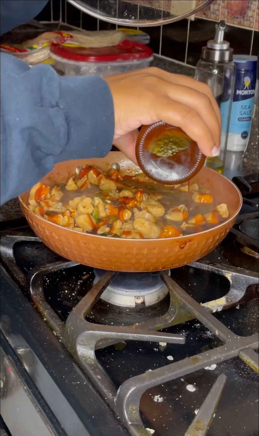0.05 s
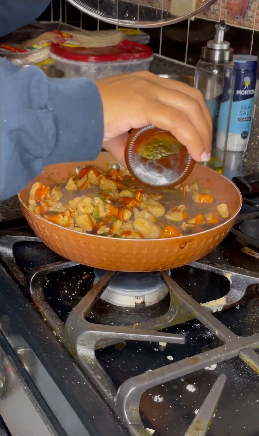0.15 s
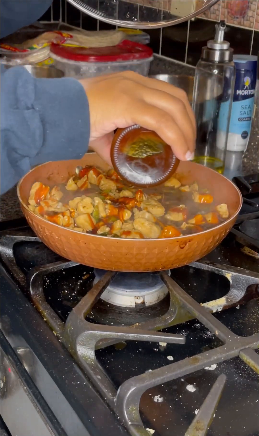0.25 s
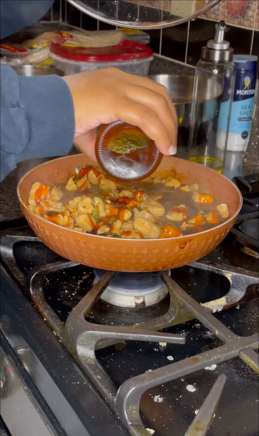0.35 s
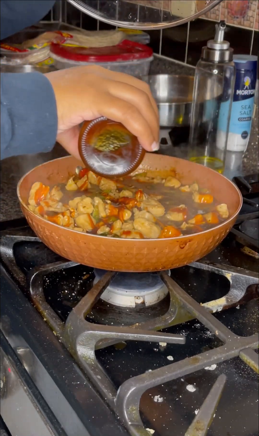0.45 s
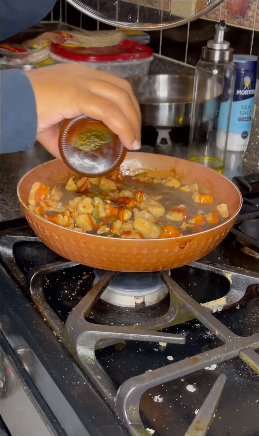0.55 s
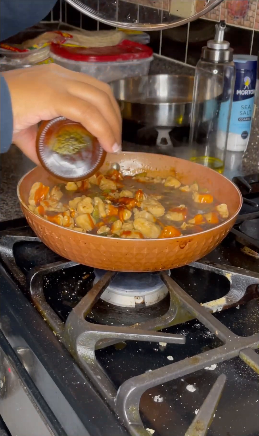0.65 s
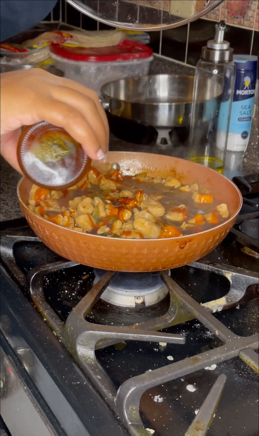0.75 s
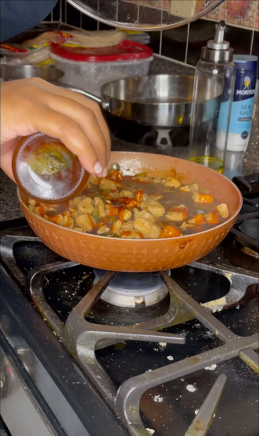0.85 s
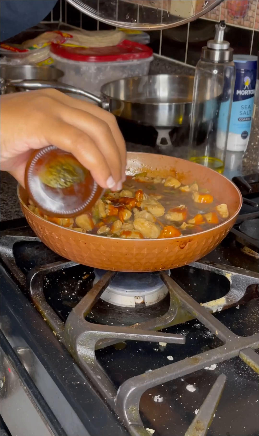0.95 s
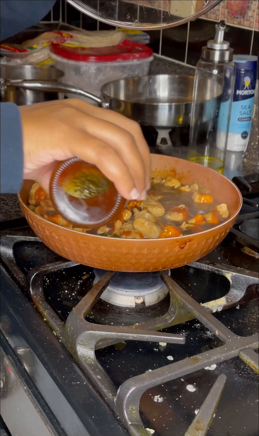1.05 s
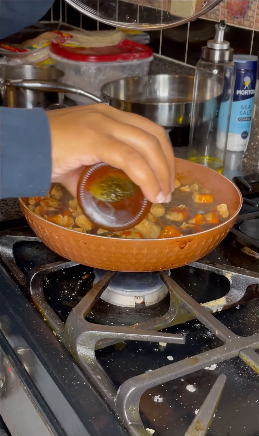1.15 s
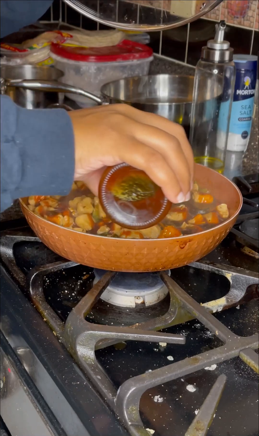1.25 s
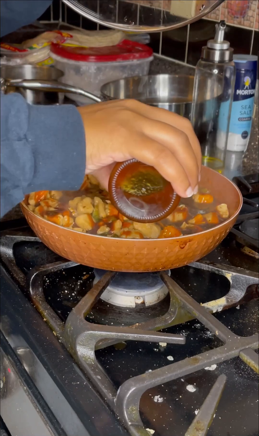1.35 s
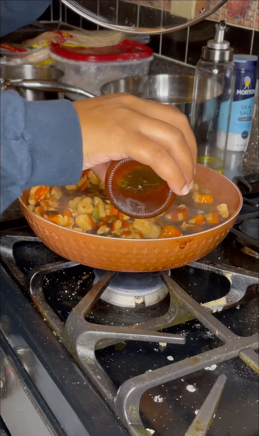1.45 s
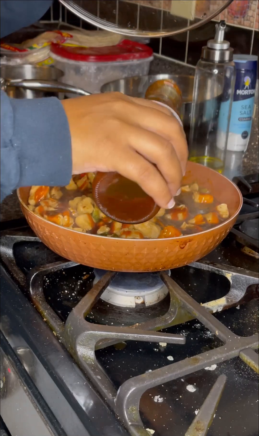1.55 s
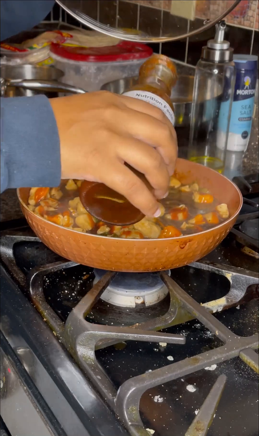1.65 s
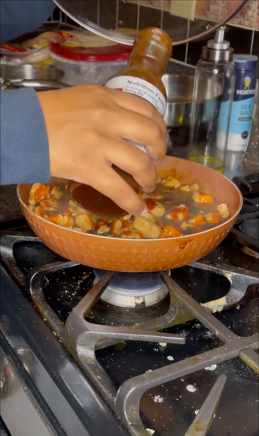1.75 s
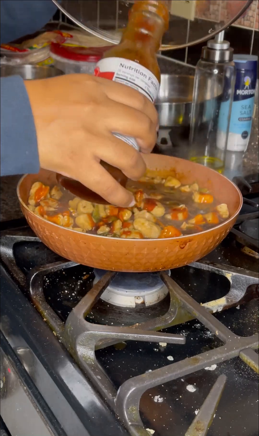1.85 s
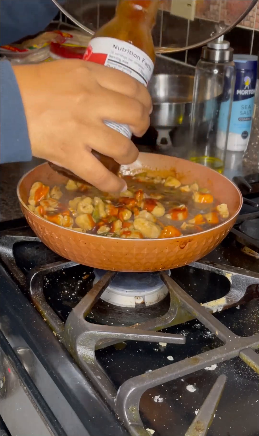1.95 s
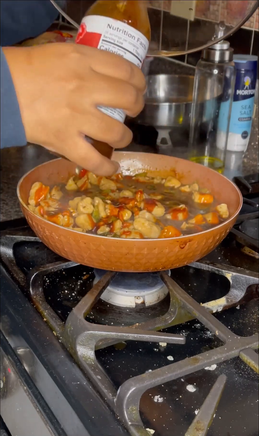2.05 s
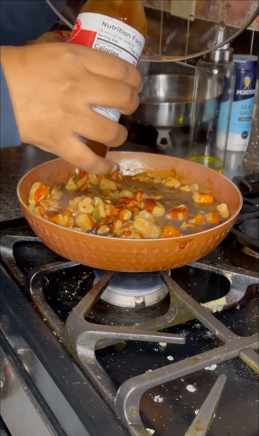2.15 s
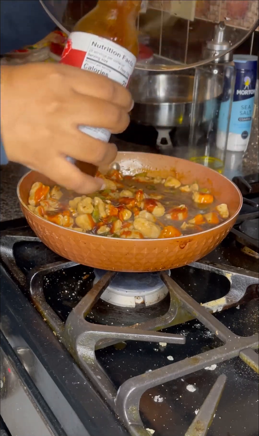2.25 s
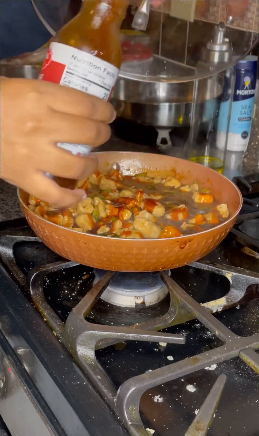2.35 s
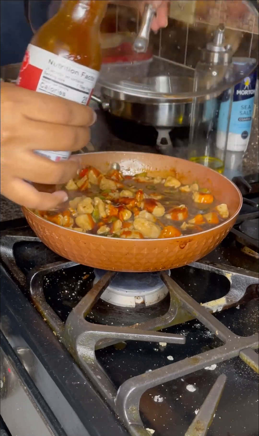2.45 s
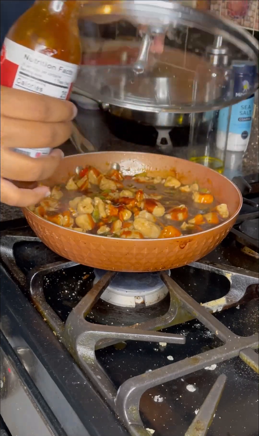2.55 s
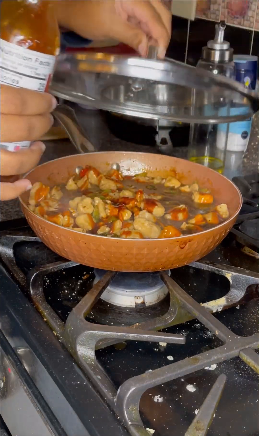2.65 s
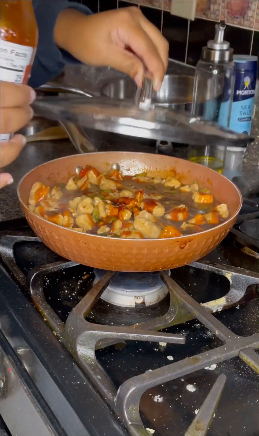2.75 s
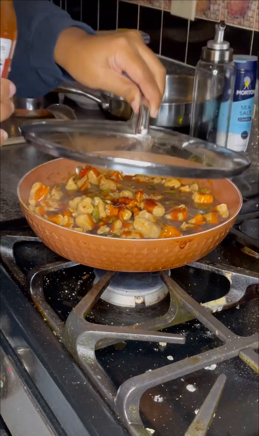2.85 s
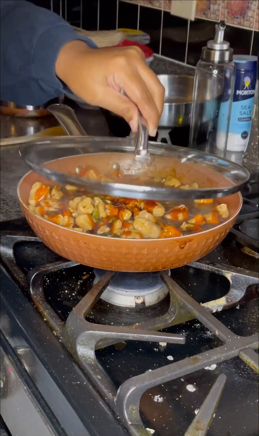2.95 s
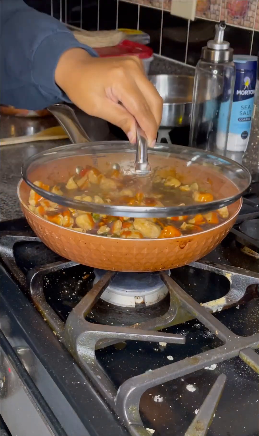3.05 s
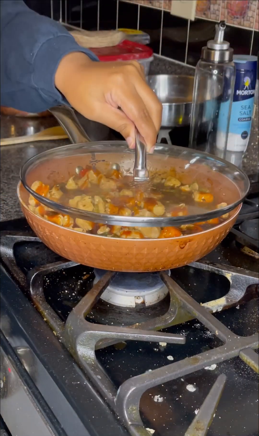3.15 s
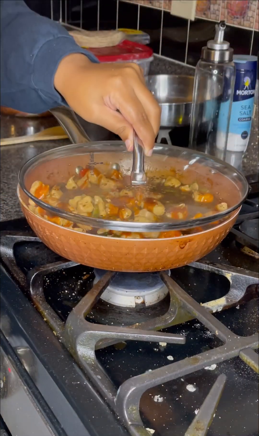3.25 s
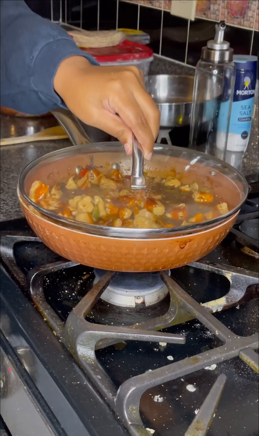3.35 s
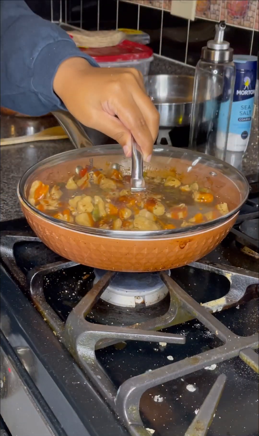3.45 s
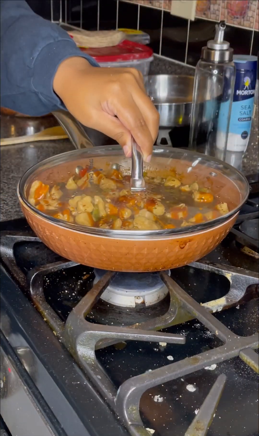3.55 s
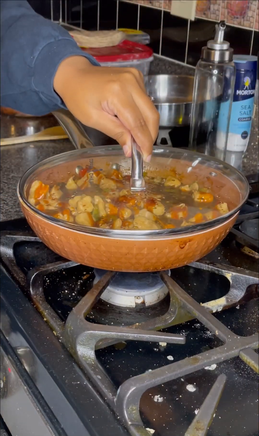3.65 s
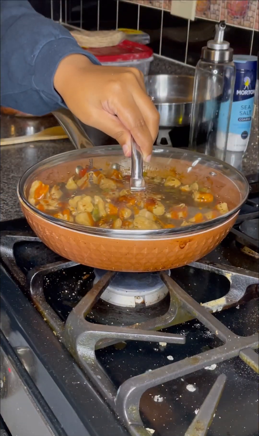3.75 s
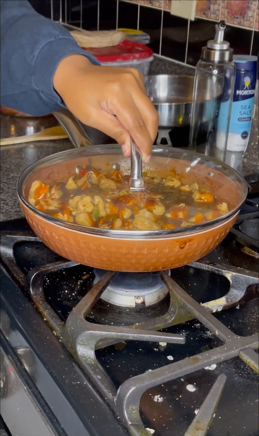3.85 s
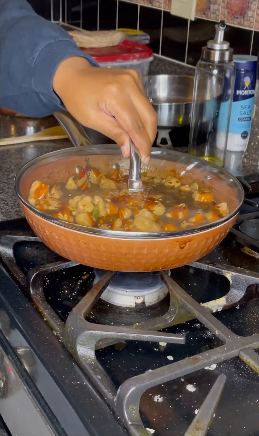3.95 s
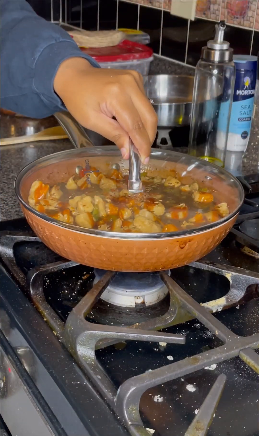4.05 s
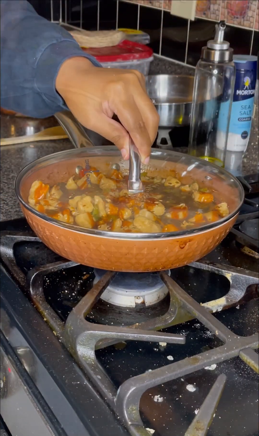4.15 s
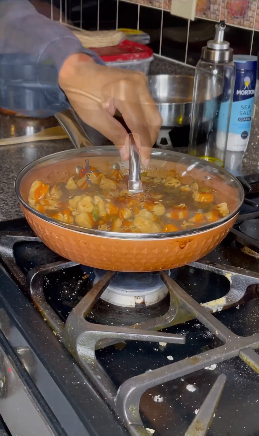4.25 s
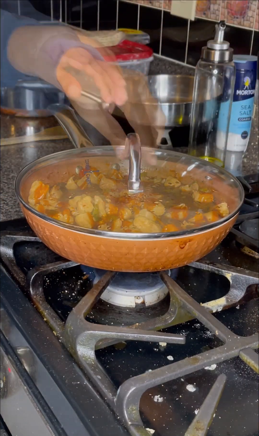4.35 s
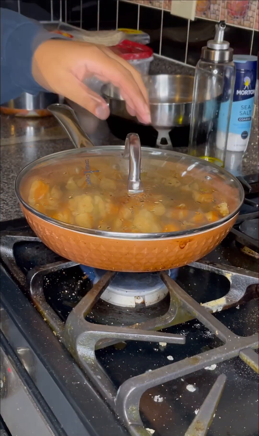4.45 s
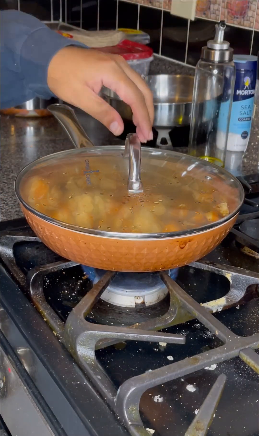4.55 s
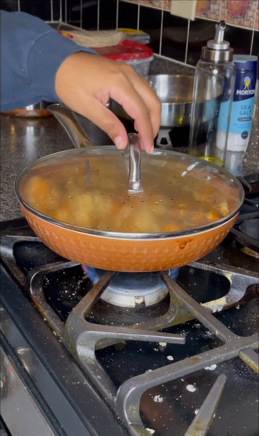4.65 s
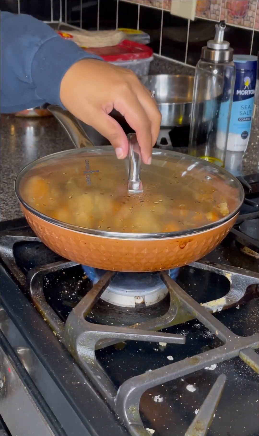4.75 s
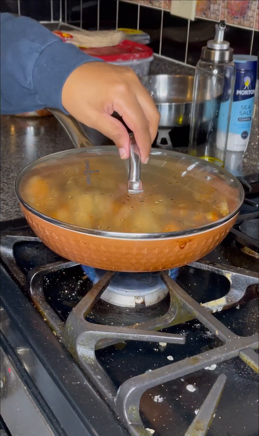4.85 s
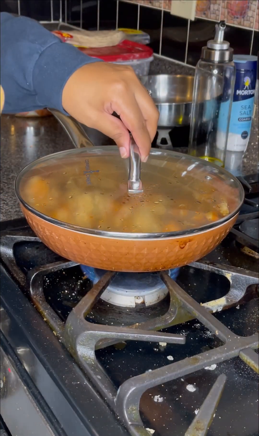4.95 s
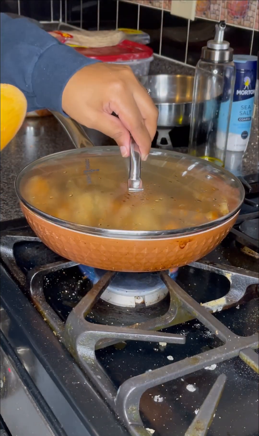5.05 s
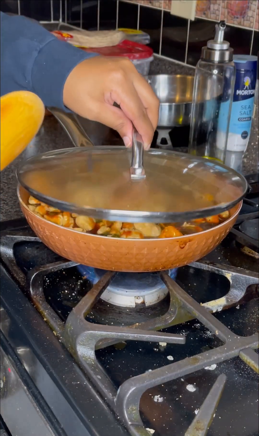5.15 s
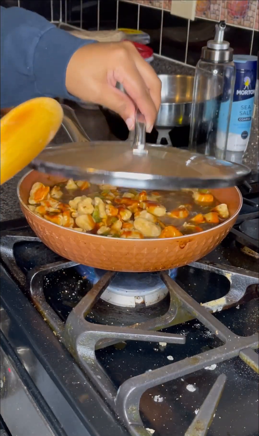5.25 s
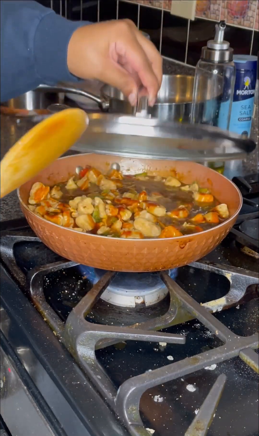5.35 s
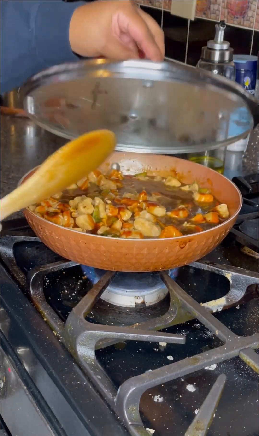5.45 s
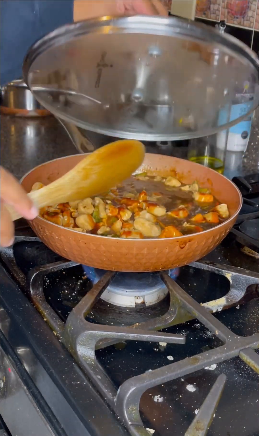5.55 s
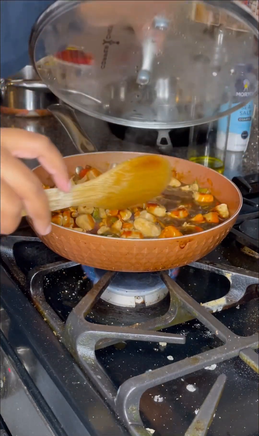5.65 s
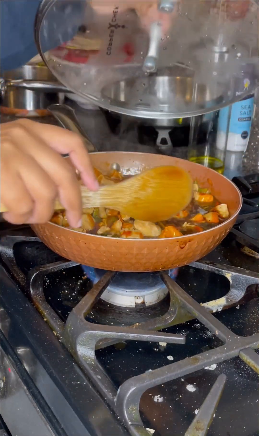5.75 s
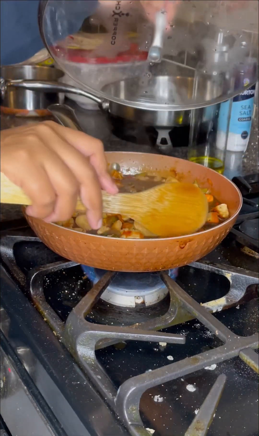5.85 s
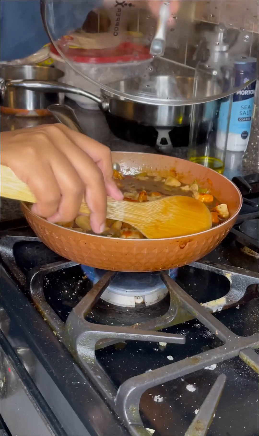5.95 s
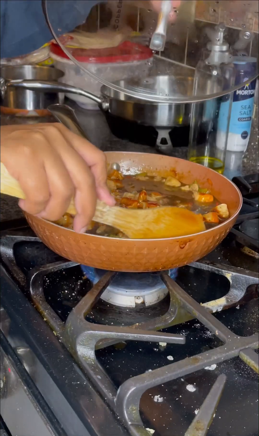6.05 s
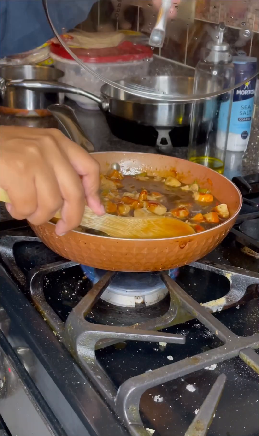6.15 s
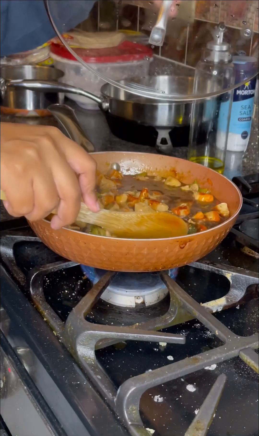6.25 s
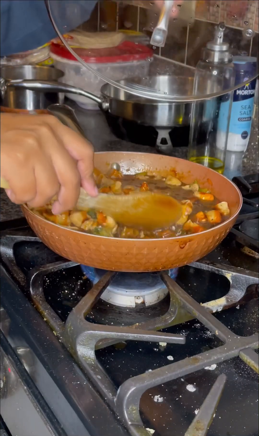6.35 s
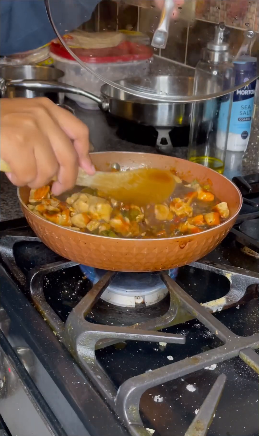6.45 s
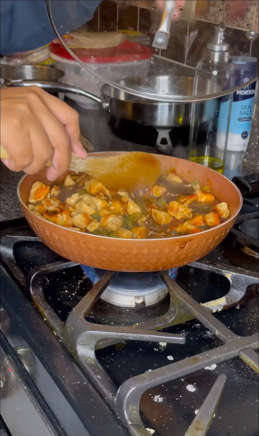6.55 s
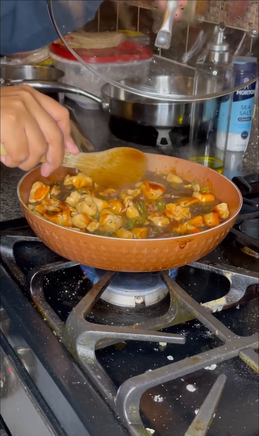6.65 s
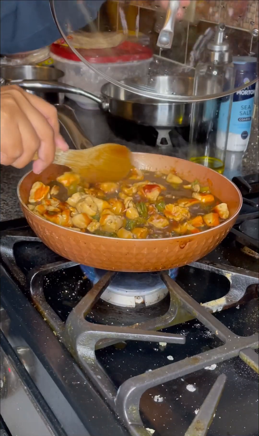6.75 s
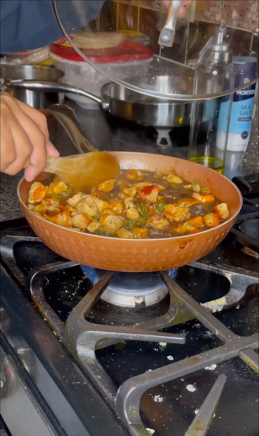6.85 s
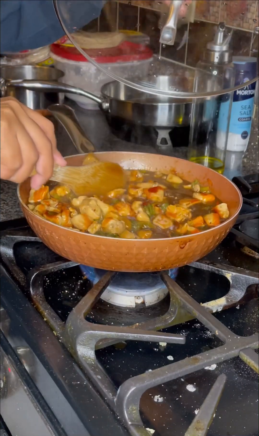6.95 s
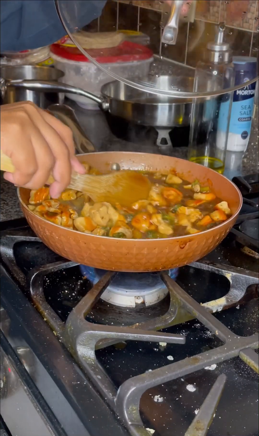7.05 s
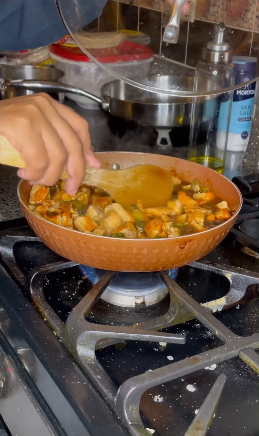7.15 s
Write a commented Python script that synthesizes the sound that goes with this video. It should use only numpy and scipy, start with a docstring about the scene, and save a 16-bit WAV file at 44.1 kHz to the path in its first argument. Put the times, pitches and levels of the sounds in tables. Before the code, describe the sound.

Steady kitchen fan hum, soft bottle slosh, bright lid crash settling with dull clunks, then rising simmer, wet pops and wooden stirring.

```python
"""A stir fry simmers on a gas hob under a humming kitchen fan, close to a pair of microphone ports.
A sleeve rustles and a sauce bottle is shaken; then a steel-rimmed glass lid clatters onto the pan and is
pushed home. The sauce comes to the boil, the lid is lifted, and a wooden spoon knocks and scrapes through
the food. Pan, lid and grate are sets of decaying sines with noise for the rough contacts; the sauce is a
rain of short bubble tones over hiss; the fan and the gas flame are coloured noise, with sine lines for the fan."""
import sys
import numpy as np
from scipy import signal
from scipy.fft import rfft, irfft, next_fast_len
from scipy.io import wavfile

SR = 44100
rng = np.random.default_rng(int(sys.argv[2]) if len(sys.argv) > 2 else 0)


def master_out(mix):
    """Clip the mix to full scale and print it as 16-bit PCM to the path in sys.argv[1]."""
    frames = np.transpose(np.atleast_2d(mix))
    ceiling = np.clip(frames, -1, 1)
    pcm = np.round(ceiling * 32767).astype(np.int16)
    wavfile.write(sys.argv[1], SR, pcm)


N = 317079
T = np.arange(N) / SR  # seconds
RING_T = T[:SR * 3 // 5]  # the 0.6 s given to each single hit

# Likeness of left and right in the room. Each row: frequency in Hz, correlation.
ROOM_LIKENESS = [(60, 1), (130, 0.97), (290, 0.92), (640, 0.31), (1400, 0.14), (3100, 0.18), (7000, 0.018)]
# Spectrum of frying sauce. Each row: frequency in Hz, relative level in dB per Hz.
SIZZLE_COLOUR = [(40, -17.5), (140, -4), (400, 2.5), (650, 23), (900, 6.5), (1900, 2.5), (3000, 2.5),
                 (4300, 3), (6000, 2.5), (8000, -1), (10700, 8), (11800, -11), (12900, -31.5),
                 (16000, -50.5)]
# Strength of the boil as the sauce heats up. Each row: time in seconds, relative level in dB.
BOIL_STRENGTH = [(0, -89), (2.9, -88), (3.7, -102), (3.85, -79), (4.6, -72), (5.25, -64), (5.8, -64),
                 (6.2, -58.5), (6.5, -61), (6.65, -61.5), (7.19, -62.5)]
# Floor of the open pan with food on it. Each row: frequency in Hz, relative level in dB, t60 in seconds.
OPEN_PAN_MODES = [(142, -2, 0.22), (283, -1, 0.091), (317.6, -1.5, 0.11), (405, 1, 0.073),
                  (513, -4.5, 0.13), (570, 1, 0.094), (721, -9.5, 0.11), (825, -5.5, 0.062),
                  (944, -9, 0.079), (1740, -2, 0.038), (2405, -1.5, 0.052)]
# Crowded upper modes of the lid's rim. Each row: frequency in Hz, relative level in dB per Hz.
CLASH_COLOUR = [(25, -42), (70, -31), (300, -4.5), (600, 7.5), (950, -3), (1300, -4.5), (1800, 2),
                (3200, -1.5), (4500, -1.5), (5600, -1.5), (8000, -2), (10700, 3.5), (12500, -7.5),
                (13800, -19), (16000, -39.5)]

PRESSED_S = 3.4  # from then on the hand bears on the lid
PAN_DETUNE = .02  # largest share by which a hit's pan modes shift; the grate's move twice as far


# Tools for level, colour and decay

def amp(db):
    """Turns dB into a gain."""
    return 10 ** (np.asarray(db) / 20)


def unit(x):
    """Scales a steady sound to an RMS of 1."""
    return x / np.sqrt(np.mean(x ** 2) + 1e-20)


def burst(x):
    """Scales a hit to the energy of 10 ms at level 1."""
    return x / np.sqrt(np.sum(x ** 2) / (SR / 100) + 1e-20)


def read(points, hz):
    """Reads a table over frequency, straight between points on a log scale."""
    f, value = np.transpose(points)
    return np.interp(np.log(hz + 1), np.log(f + 1), value)


def curve(rows):
    """Turns rows of time and value into one value per sample."""
    rows = np.asarray(rows)
    return np.interp(T, rows[:, 0], rows[:, 1])


def add(mix, s, sound):
    """Lays a sound into the mix from the given second."""
    part = mix[round(s * SR):][:len(sound)]
    part += sound[:len(part)]


def colour(x, points):
    """Causal minimum-phase filter with the given spectrum."""
    log_gain = np.log(amp(read(points, abs(np.fft.fftfreq(8192, 1 / SR)))))
    taps = np.fft.ifft(np.exp(np.conj(signal.hilbert(log_gain)))).real[:2048]
    return signal.oaconvolve(x, taps)[:len(x)]


def dying(t60, t=RING_T):
    """Exponential decay by 60 dB in t60 seconds."""
    return np.exp(-np.log(1000) * t / t60)


def swell(s, rise, fall):
    """A smooth rise to 1 at the given moment, and a fall."""
    return np.exp(-.5 * ((T - s) / np.where(T < s, rise, fall)) ** 2)


def drift(hz):
    """Slow random wander of RMS 1, with nothing faster than hz."""
    spectrum = rfft(rng.standard_normal(N))
    return unit(irfft(spectrum * (np.fft.rfftfreq(N, 1 / SR) < hz), N))


# Physical building blocks

def ring(modes, stretch=1, detune=0, in_step=False):
    """One decaying sine a mode; its sign, strength and exact pitch vary by chance from blow to blow."""
    hz, db, t60 = np.transpose(modes)[:, :, None]
    share = rng.choice([-1, 1], hz.shape) * amp(rng.uniform(-2, 2, hz.shape))
    if in_step:
        share = abs(share)
    hz = hz * (1 + detune * rng.uniform(-1, 1, hz.shape))
    return share * amp(db) * dying(t60 * stretch) * np.sin(2 * np.pi * hz * RING_T)


def thud(modes, hz, focus, detune=0, rise=0.002):
    """The pan's modes, all pushed the same way; the contact favours those near its own pitch."""
    ratio = np.array(modes)[:, 0] / hz
    weight = 1 / np.hypot(1, focus * (ratio - 1 / ratio))
    body = weight @ ring(modes, detune=detune, in_step=True)
    return burst(body * (1 - np.exp(-RING_T / rise)))


def rock(rise=0.00061, damping_t60=0.32, hob_db=-4, hob_t60=0.32):
    """The heavy grate takes a moment to get moving, and the hob top booms under it."""
    # Grate under the pan's weight. Each row: frequency in Hz, relative level in dB, undamped t60 in seconds.
    grate_modes = [(80, -14, 0.12), (98, -12.5, 0.22), (110.3, -15, 0.16), (127, -12.5, 0.19),
                   (153, 2.5, 0.25), (164.5, -1.5, 0.43)]
    # Boom of the sheet-metal hob top. Each row: frequency in Hz, relative level in dB per Hz.
    hob_colour = [(25, -18), (45, -11), (75, -2), (110, -6), (160, -1.5), (230, -13), (500, -40.5),
                  (2000, -81.5)]
    grate = ring(grate_modes, detune=PAN_DETUNE * 2).sum(0)
    grate = burst(grate * (1 - np.exp(-RING_T / rise)) * dying(damping_t60))
    boom = burst(colour(rng.standard_normal(len(RING_T)) * dying(hob_t60), hob_colour))
    return burst(grate + amp(hob_db) * boom)


def clack(top_hz, t60, rise=0.0012):
    """The dull crack of a soft contact: coloured noise cut above top_hz."""
    # Each row: frequency in Hz, relative level in dB per Hz.
    clack_colour = [(80, -19), (300, 1.5), (650, -0.5), (1000, -9.5), (1500, -6), (2100, -4.5), (3200, -12),
                    (10000, 11), (14000, -16)]
    noise = rng.standard_normal(len(RING_T)) * dying(t60) * (1 - np.exp(-RING_T / rise))
    low_pass = signal.butter(3, top_hz, fs=SR, output="sos")
    return burst(signal.sosfilt(low_pass, colour(noise, clack_colour)))


def bubble(hz, cycles, glide=0.052):
    """A bubble's tone is loudest after the given cycles, and its pitch rises a little as it opens."""
    u = T[:2048] * hz / cycles
    phase = 2 * np.pi * cycles * (u + glide * (u - 1 + np.exp(-u)))
    return u * np.exp(1 - u) * np.sin(phase)


# Background: fan, flame and cooking

def fan(air_db=-59.5, waver=0.14):
    """Rushing air and the wavering lines of the motor, spread by the room."""
    # Lines of the motor. Each row: frequency in Hz, level in dB before the sqrt(2) lift of the mix.
    hum_lines = [(59.1, -70.5), (113, -74.5), (204.6, -79.5), (236.9, -72), (296.1, -71.5), (320.5, -74),
                 (376.8, -71.5), (414.5, -63.5), (431, -71.5), (473.7, -66), (506, -80.5), (532.9, -78),
                 (591, -80), (640, -79), (650, -81), (738, -85.5), (828, -82), (1593, -88), (2005, -93),
                 (3488, -96.5)]
    # Each row: frequency in Hz, relative level in dB per Hz.
    air_colour = [(20, -37), (35, -3), (60, -6.5), (120, 4), (165, -1.5), (220, -2), (270, -1), (350, -1),
                  (410, -0.5), (480, -4), (540, -5), (1000, -15), (2000, -28), (4000, -47), (11000, -58),
                  (14000, -68)]
    # Each row: frequency in Hz, left minus right in dB.
    left_tilt = [(60, -1), (200, 1), (400, -5), (700, -2.5), (1300, 1)]
    hz = np.fft.rfftfreq(N, 1 / SR)
    a, b = rfft(rng.standard_normal((2, N)))
    same = np.clip(read(ROOM_LIKENESS, hz), -1, 1)
    side = amp(read(left_tilt, hz) / 2)
    left = a * side
    right = (same * a + np.sqrt(1 - same ** 2) * b) / side
    air = irfft(np.array([left, right]) * amp(read(air_colour, hz)), N)
    wobble = [drift(10) for _ in range(3)]
    hum = np.zeros(N)
    for k, (f, db) in enumerate(hum_lines):
        level = amp(db) * (1 + waver * wobble[k % 3])
        phase = 2 * np.pi * (f * T + rng.random()) + waver * wobble[(k + 1) % 3]
        hum += level * np.sin(phase)
    return amp(air_db) * unit(air) + np.sqrt(2) * irfft(rfft(hum) * np.array([side, 1 / side]), N)


def flame(db=-84):
    """Gas streams steadily from the burner as coloured hiss."""
    # Each row: frequency in Hz, relative level in dB per Hz.
    gas_colour = [(1500, -14), (3000, -4), (3500, 4.5), (4300, -3), (5900, 3.5), (7500, 2.5), (9000, -6),
                  (11000, 0.5), (13000, -17.5), (14500, -36)]
    return amp(db) * unit(colour(rng.standard_normal(N), gas_colour))


def bubbles(per_s, spread_db, low_hz, high_hz, ring_s):
    """A random rain of bursting bubbles of many pitches and sizes, coming in clumps."""
    rate = per_s * np.exp(.6 * drift(25))
    size = amp(spread_db * np.minimum(rng.exponential(1, N), 3.5)) * (rng.random(N) < rate / SR)
    pitches = np.geomspace(low_hz, high_hz, num=36)
    kind = rng.choice(len(pitches), N, p=pitches ** .5 / np.sum(pitches ** .5))
    out = np.zeros(N)
    for k, hz in enumerate(pitches):
        # small, high bubbles die sooner; ring_s is the typical time at 1 kHz
        grain = bubble(hz, ring_s * np.sqrt(1000 * hz) * rng.uniform(.5, 1.5))
        grain = grain / np.linalg.norm(grain) * hz ** .25
        out += signal.oaconvolve(size * (kind == k), grain)[:N]
    return unit(out)


def simmer(hiss_db=-3, level_db=3, split_hz=2200):
    """Fine fizz over a hiss; the fat bubbles of the sauce come through once the lid is off."""
    # Sauce is thrown onto hot metal and flares up.
    # Each row: peak in seconds, relative level in dB, wetness below the split in dB.
    flare_ups = [(3.831, -66, -9), (4.438, -69, 2), (5.36, -68, -13), (6.11, -68, -20), (6.47, -75, -3),
                 (6.94, -70, 9), (7.095, -57.5, -30)]
    flare_rise_s, flare_fall_s = 0.038, 0.033
    # from full_from_db up the boil is full and wet below the split; a weaker one thins out (dB per dB)
    full_db, full_from_db, thin_slope = 4.5, -73, 0.42

    fine = bubbles(2600, 3.5, 900, 12000, .0004)
    fat = bubbles(650, 4.0, 1000, 9000, .0012) * np.interp(T, [4.9, 5.3], [.5, 1.5])
    hiss = amp(hiss_db) * rng.standard_normal(N)
    fizz = unit(colour(fine + fat + hiss, SIZZLE_COLOUR))
    fizz = fizz * amp(1.5 * drift(22))  # the sauce erupts in irregular spurts
    low = signal.filtfilt(*signal.butter(2, split_hz, fs=SR), fizz)
    boil_db = curve(BOIL_STRENGTH)
    full = amp(full_db + thin_slope * np.minimum(boil_db - full_from_db, 0))
    boil = amp(boil_db) * (fizz + (full - 1) * low)
    flares = np.zeros(N)
    for s, db, wet_db in flare_ups:
        flares += amp(db) * swell(s, flare_rise_s, flare_fall_s) * (fizz + (amp(wet_db) - 1) * low)
    return amp(level_db) * (boil + flares)


def gurgle(hz, cycles=2.3, spray_cycles=0.55, spray_db=-9, spread_s=.025, count=12):
    """A fat bubble bursts and sets off a clump of smaller, drier ones."""
    out = np.zeros(len(RING_T))
    add(out, 0, bubble(hz, cycles))
    for late, octaves, size in rng.random((count, 3)):
        small = bubble(hz * 2 ** (1.7 * octaves - .4), spray_cycles)
        add(out, spread_s * late, amp(spray_db - 6 * size) * small)
    return out


def pops(pop_db=-1, pop_cycles=0.91, snap=0.28, snap_t60=0.042, blip_db=-3):
    """Single bubbles: the pocket rings and the film tears into a short spray; fat ones gurgle."""
    # The clearest bubbles bursting and wet smacks.
    # Each row: start in seconds, level in dB before trim and colour, starting pitch in Hz.
    bursts = [(0.088, -47.5, 9500), (0.871, -52, 6300), (0.993, -46.5, 8800), (1.033, -51, 6550),
              (1.099, -56, 7500), (1.2573, -54.5, 6500), (1.354, -58.5, 7440), (1.603, -60, 3850),
              (1.734, -55, 6200), (1.898, -57, 6360), (1.9947, -47.5, 9300), (2.085, -52.5, 5160),
              (2.2182, -41, 6300), (2.229, -58, 7000), (2.2525, -48, 3740), (2.273, -64, 6000),
              (2.292, -67, 5500), (2.7745, -49.5, 6700), (2.7882, -48, 5870), (5.18, -40, 10800),
              (5.221, -43, 4000), (5.229, -35, 11100), (5.232, -39, 5760), (5.432, -43, 6300),
              (5.433, -39, 10700), (5.53, -44, 11000), (5.576, -48, 5540), (5.599, -40, 10200),
              (5.6232, -49.5, 5320), (5.624, -41, 11000), (6.089, -27.5, 11300), (6.139, -32.5, 6560),
              (6.198, -33.5, 5820), (6.3966, -30.5, 7100), (6.451, -36, 7340), (6.537, -44, 7500),
              (6.539, -30.5, 10600), (6.7, -38, 6650), (6.828, -27, 7300), (6.8568, -34, 6100),
              (6.874, -28.5, 10200), (6.935, -28.5, 6800), (6.982, -30.5, 10400)]
    # Fat bubbles and wet bursts that ring in the pan.
    # Each row: start in seconds, level in dB before trim, starting pitch in Hz.
    fat_bursts = [(1.852, -60, 2380), (5.02, -50, 1790), (5.112, -44, 1950), (5.474, -47, 2270),
                  (5.56, -45, 1350), (5.574, -64, 1820), (5.623, -50, 1430), (5.756, -45.5, 2080),
                  (6.131, -39.5, 2410), (6.241, -39.5, 2500), (6.262, -39, 1440), (6.28, -36, 1420),
                  (6.289, -43, 2450), (6.346, -44, 1340), (6.46, -40.5, 1230), (6.474, -40, 2400),
                  (6.584, -45, 2220), (6.70, -44.5, 1940), (6.777, -49, 1450), (6.905, -44, 2220),
                  (6.928, -33, 1980), (6.963, -43.5, 2100), (7.085, -46, 2420)]
    out = np.zeros(N)
    for s, db, hz in bursts:
        tone = bubble(hz, pop_cycles)
        spray = rng.standard_normal(len(tone)) * dying(snap_t60, T[:len(tone)])
        spray = signal.lfilter(*signal.butter(2, hz * .6, "high", fs=SR), spray)
        add(out, s, amp(db + pop_db) * (tone + snap * spray))
    out = colour(out, SIZZLE_COLOUR)
    for s, db, hz in fat_bursts:
        add(out, s, amp(db + blip_db) * gurgle(hz))
    return out


def cavity(width_hz=42, shut_db=-1, lift_db=-57.0):
    """The bubbling sounds the air between pan and lid; its pitch climbs as the lid lifts, then eases."""
    # Each row: time in seconds, pitch of the air in Hz.
    lift_pitch = [(5.12, 530), (5.2, 650), (5.3, 715), (5.37, 700)]
    noise = rng.standard_normal(N) + 1j * rng.standard_normal(N)
    murmur = signal.lfilter(*signal.butter(2, width_hz, fs=SR), noise)
    # turning slow complex noise makes a narrow band that follows the pitch
    turn = np.exp(2j * np.pi * np.cumsum(curve(lift_pitch)) / SR)
    start, end = lift_pitch[0][0], lift_pitch[-1][0]
    gap = np.interp(T, [start, end], [0, 1])
    shut = amp(curve(BOIL_STRENGTH) + shut_db) * (T > PRESSED_S) * (1 - gap)
    lifting = amp(lift_db) * np.sqrt(abs(np.sin(np.pi * gap)))
    return (shut + lifting) * unit((murmur * turn).real)


# Handling: sleeve, bottle, lid and spoon

def sleeve(rise_s=0.011, fall_s=0.014, fibres_per_s=2500):
    """Cloth rustles softly as the arm shakes the bottle: random ticks under short swells."""
    # Each row: peak in seconds, level in dB.
    rustle_peaks = [(.785, -74.5), (.885, -75), (.94, -73.5), (.985, -73), (1.05, -71.5), (1.115, -75),
                    (1.275, -76), (1.37, -79), (1.615, -89)]
    # Each row: frequency in Hz, relative level in dB per Hz.
    cloth_colour = [(1000, -33), (2400, -10), (3400, 0), (4600, -7), (6300, 1), (8000, 3), (11000, -24),
                    (14000, -36)]
    fibres = rng.standard_normal(N) * (rng.random(N) < fibres_per_s / SR)
    strength = sum(amp(db) * swell(s, rise_s, fall_s) for s, db in rustle_peaks)
    return unit(colour(fibres, cloth_colour)) * strength


def bottle(top_hz=1450, t60=0.31, cycles=1.3):
    """Thick sauce slaps the bottle wall and thumps the air pocket behind it."""
    # Each row: start in seconds, slap level in dB, thump level in dB, starting thump pitch in Hz.
    slumps = [(1.467, -52, -46.5, 350), (1.472, -66, -40, 200), (1.501, -69, -51, 306),
              (2.175, -51.5, -55, 294), (2.196, -58, -66, 306)]
    out = np.zeros(N)
    for s, slap_db, thump_db, hz in slumps:
        add(out, s, amp(slap_db) * clack(top_hz, t60))
        add(out, s, amp(thump_db) * burst(bubble(hz, cycles)))
    return out


def wobbles(rise_s=.0095):
    """The pan tips and settles on the grate with soft, low bumps."""
    # Each row: start in seconds, level in dB, pitch in Hz.
    bumps = [(2.946, -25, 156), (2.985, -45, 80), (3.035, -41, 84.1), (3.09, -36.5, 162.4),
             (3.099, -40, 85.7), (3.145, -40, 81.5), (3.21, -51.5, 96), (3.275, -45.5, 90),
             (3.381, -37, 159), (3.44, -39, 134), (3.84, -47.5, 153.6), (3.944, -36, 164),
             (4.007, -29, 161), (5.055, -49.5, 145), (6.092, -33, 142)]
    out = np.zeros(N)
    for s, db, hz in bumps:
        bump = RING_T * np.exp(-RING_T / rise_s) * np.sin(2 * np.pi * hz * RING_T)
        add(out, s, amp(db) * burst(bump))
    return out


def chatter(hz, depth_db):
    """Uneven gain of a rim that buzzes against the pan."""
    knots = np.arange(0, RING_T[-1] + 1 / hz, 1 / hz)
    return amp(depth_db * np.interp(RING_T, knots, rng.standard_normal(len(knots))))


def rim(count=80, t60=0.056):
    """Each hit on the rim wakes its own random crowd of short-lived modes."""
    hz = rng.uniform(900, 13000, count)
    modes = np.transpose([hz, read(CLASH_COLOUR, hz), np.full(count, t60)])
    return burst(ring(modes).sum(0))


def contact(x, hz, lift_db=6.0, sharpness=6.5):
    """The point of the rim that is struck brings out the modes around one pitch."""
    return x + (amp(lift_db) - 1) * signal.lfilter(*signal.iirpeak(hz, sharpness, fs=SR), x)


def lid(clash_t60=0.049, shimmer_db=-17, shimmer_t60=0.85, modes_db=-5, rim_db=0.5, noise_db=-4, focus=4.64):
    """Each touch of the rim is a short, chattering crash of crowded modes, a glassy ring and a pan thud."""
    # Lid meets pan. Each row: start in seconds, rim clash level in dB, clash pitch in Hz,
    # pan thud level in dB, thud pitch in Hz, grate rocking level in dB.
    touches = [(2.9459, -16, 5270, -28, 650, -36), (2.948, -25.5, 1830, -17.5, 673, -33),
               (2.957, -27.5, 2920, -29.5, 320, -46), (2.972, -34, 1140, -32.5, 330, -32),
               (3.071, -21, 3430, -22, 637, -37), (3.105, -29, 2310, -49, 540, -40.5),
               (3.125, -33, 2940, -34.5, 600, -38), (3.207, -29, 1840, -35, 600, -36),
               (3.212, -27, 1090, -27.5, 530, -35), (3.246, -39.5, 5500, -50, 550, -52),
               (3.3553, -40, 1550, -35, 337, -45), (3.366, -45.5, 2000, -38, 447, -44.5),
               (3.398, -54, 1800, -46, 380, -47), (3.4222, -42.5, 3520, -55, 308, -42),
               (3.437, -40.5, 1550, -39, 845, -38.5), (3.451, -48, 1780, -40.5, 298.5, -41.5),
               (3.472, -53, 4080, -43, 433, -49), (3.841, -58.5, 2800, -60, 250, -47.5),
               (3.879, -55.5, 5970, -66, 302, -55), (3.9181, -32, 2520, -52, 990, -62),
               (3.924, -28.5, 1700, -29, 990, -44), (3.927, -38.5, 2930, -24.5, 393, -35),
               (4.001, -39.5, 2500, -29, 295, -30), (4.0092, -30.5, 3330, -26.5, 313, -44),
               (4.015, -43, 1850, -29.5, 295, -28.5), (4.089, -60.5, 6000, -61, 430, -59)]
    # Pan under the lid. Each row: frequency in Hz, relative level in dB, t60 in seconds.
    pan_modes = [(226, -7.5, 0.2), (294, 0.5, 0.09), (315.1, 4, 0.19), (370, 4, 0.063), (388.2, 4, 0.16),
                 (434, -7.5, 0.19), (499.6, 2, 0.11), (538, -3, 0.13), (589, 1, 0.054), (628, 6.5, 0.055),
                 (657, 0.5, 0.06), (696.4, -7, 0.15), (826, -5.5, 0.063), (960, -11, 0.06),
                 (970, -7, 0.069)]
    # Glass of the lid. Each row: frequency in Hz, relative level in dB, t60 in seconds before the stretch.
    glass_modes = [(1120, 0.5, .17), (1459, -9, .1), (1693, -4, .17), (1767, 0, .15), (1835, 0, .15),
                   (2010, -7, .13), (2421, -4, .15), (2864, -1, .15), (3160, -4, .14), (3405, -4, .13),
                   (4242, -6, .13), (5303, -5, .14), (5521, -2, .12), (6530, -7, .14), (7052, -8, .14),
                   (7665, -5, .17), (9951, -4, .15), (10533, 1, .14), (10829, -2, .14), (11211, -4, .15)]
    # a clash of clash_ref_db reaches clash_top_hz; harder ones reach an octave higher per 10 dB
    clash_top_hz, clash_ref_db, db_per_octave = 6860, -32.5, 10
    out = np.zeros(N)
    for s, clash_db, clash_hz, thud_db, hz, rock_db in touches:
        # the pressed lid clashes duller and rings shorter and weaker
        stretch, dull, damped_db = (0.42, 0.71, -9) if s > PRESSED_S else (0.72, 1, 0)
        shimmer = amp(shimmer_db) * dying(shimmer_t60 * stretch) * chatter(140, 3)
        fade = dying(clash_t60) + shimmer
        crash = burst(colour(rng.standard_normal(len(fade)) * fade, CLASH_COLOUR))
        glass = burst(ring(glass_modes, stretch, detune=.007).sum(0) * chatter(160, 4))
        modes = amp(damped_db) * (amp(modes_db) * glass + amp(rim_db) * rim())
        clash = contact(amp(noise_db) * crash + modes, clash_hz)
        # a gentler touch lasts longer and so is duller
        top_hz = dull * clash_top_hz * 2 ** ((clash_db - clash_ref_db) / db_per_octave)
        clash = signal.lfilter(*signal.butter(1, min(top_hz, SR * .45), fs=SR), clash)
        add(out, s, amp(clash_db) * burst(clash))
        add(out, s, amp(thud_db) * thud(pan_modes, hz, focus, detune=PAN_DETUNE))
        add(out, s, amp(rock_db) * rock())
    return out


def squelches(tears_per_s=1500, rise_s=0.0014, width=1.4, spread_db=4):
    """Sauce tears away from spoon and food in tight clusters of tiny wet clicks."""
    # Each row: start in seconds, level in dB, centre pitch in Hz, fade length in seconds.
    wet_crackles = [(5.343, -54.5, 2870, 0.031), (5.47, -57.5, 2830, .015), (5.559, -70, 1700, 0.014),
                    (6.244, -64, 1870, 0.034), (6.28, -42, 3000, 0.015), (6.457, -48.5, 2250, 0.028),
                    (6.58, -54.5, 2600, 0.022), (6.692, -54, 2360, .02), (6.926, -47, 1880, 0.0084),
                    (6.935, -47.5, 3200, 0.0068), (6.955, -62, 2060, .03), (7.023, -57, 2500, 0.0088),
                    (7.083, -54, 3250, .025)]
    out = np.zeros(N)
    for s, db, hz, length_s in wet_crackles:
        size = amp(spread_db * np.minimum(rng.exponential(1, len(RING_T)), 3))
        tears = size * rng.choice([-1, 1], len(RING_T)) * (rng.random(len(RING_T)) < tears_per_s / SR)
        tears = tears * (1 - np.exp(-RING_T / rise_s)) * np.exp(-(RING_T / length_s) ** 2)
        edges = hz * 2 ** (np.array([-.5, .5]) * width)  # width in octaves
        band = signal.butter(2, np.minimum(edges, SR * .45), "band", fs=SR)
        add(out, s, amp(db) * burst(signal.lfilter(*band, tears)))
    return out


def knocks(t60=0.028, rock_db=-15, focus=0.81):
    """Wood on the open pan gives a dull clack and a broad thud, and rocks the grate a little."""
    # Each row: start in seconds, clack level in dB, clack top in Hz, thud level in dB, thud pitch in Hz.
    spoon_hits = [(5.897, -34, 2270, -40, 800), (5.900, -46, 2200, -30.5, 570),
                  (5.910, -61, 1800, -28, 380), (6.075, -63, 900, -43, 288), (6.101, -49, 1000, -36, 540),
                  (6.282, -43, 4800, -44.5, 650), (6.461, -63, 3500, -63, 600),
                  (6.927, -50, 2600, -46.5, 700), (7.027, -47.5, 2420, -55, 596)]
    out = np.zeros(N)
    for s, clack_db, top_hz, thud_db, hz in spoon_hits:
        body = thud(OPEN_PAN_MODES, hz, focus) + amp(rock_db) * rock()
        add(out, s, amp(clack_db) * clack(top_hz, t60) + amp(thud_db) * body)
    return out


def drag(slips_per_s=700, contact_hz=380, rock_db=-1, shove_rock_db=-1, damping_t60=0.22):
    """The spoon sticks and slips on the pan floor, shaking pan and grate while it damps them."""
    # the spoon starts to drag, and eases as the food loosens
    stir_s, stir_db, ease_db_per_s = 5.96, -52, -5
    # its first hard push through the food
    shove_s, shove_db, shove_rise_s, shove_fall_s = 6.095, -44, 0.025, 0.03
    slips = rng.standard_normal(N) * (rng.random(N) < slips_per_s / SR)
    stir = amp(stir_db + ease_db_per_s * (T - stir_s)) * (T > stir_s)
    shove = amp(shove_db) * swell(shove_s, shove_rise_s, shove_fall_s)
    out = np.zeros(N)
    for force, grate_db in (stir, rock_db), (shove, shove_rock_db):
        body = thud(OPEN_PAN_MODES, contact_hz, focus=1.0) + amp(grate_db) * rock()
        body = body * dying(damping_t60)
        out += signal.oaconvolve(unit(slips) * force, body / np.linalg.norm(body))[:N]
    return out


# Space and microphones

def kitchen(x):
    """Reflections from hob, tiles and walls, each band dying at its own speed."""
    # Each row: frequency in Hz, t60 in seconds.
    room_decay = [(100, 0.34), (400, 0.22), (1500, 0.39), (5000, 0.16), (12000, 0.17)]
    size = (2, SR // 2)
    # sparse random echoes, none before 4 ms
    taps = rng.standard_normal(size) * (rng.random(size) < .1) * (T[:SR // 2] > .004)
    hz, t, z = signal.stft(taps, SR, nperseg=256)
    same = np.clip(read(ROOM_LIKENESS, hz), -1, 1)[:, None]
    z[1] = same * z[0] + np.sqrt(1 - same ** 2) * z[1]
    tail = signal.istft(z * dying(read(room_decay, hz)[:, None], t), SR, nperseg=256)[1]
    return signal.fftconvolve(x[None], tail / np.linalg.norm(tail[0]), axes=1)[:, :N]


def ports(x):
    """Sound from the pan reaches the two ports with a phase gap and a level gap that vary with pitch."""
    # Each row: frequency in Hz, left minus right in dB.
    pan_tilt = [(100, 0), (300, 0.5), (600, -3.5), (1000, -2), (2000, -0.5)]
    # Each row: frequency in Hz, radians by which the left port leads.
    port_lead = [(0, 0), (1300, -.3), (2500, .6), (4200, .8), (4570, 1.6), (4900, 3.14), (5250, 5.3),
                 (5650, 6.3), (6250, 6.5), (8350, 9), (9500, 9.7), (10900, 11.1), (11700, 12.4),
                 (16000, 12.6)]
    size = next_fast_len(N + SR)
    hz = np.fft.rfftfreq(size, 1 / SR)
    left = amp(read(pan_tilt, hz) / 2) * np.exp(.5j * np.interp(hz, *np.transpose(port_lead)))
    return irfft(rfft(x, size) * np.array([left, 1 / left]), size)[:, :N]


def scene(hit_room_db=-11, food_room_db=-7):
    """Blows and cooking at the pan, their reflections, and the fan."""
    food = flame() + simmer() + pops() + cavity() + squelches()
    hits = sleeve() + bottle() + wobbles() + lid() + knocks() + drag()
    room = kitchen(amp(hit_room_db) * hits + amp(food_room_db) * food)
    return fan() + room + ports(hits + food)


def record(dry):
    """The microphones fall off in the top treble; then the band limit."""
    soft = signal.sosfilt(signal.butter(8, 13600, fs=SR, output="sos"), dry)
    band_limit = signal.firwin(511, 15800, window=("kaiser", 9), fs=SR)
    return signal.oaconvolve(soft, band_limit[None], "same")


dry = scene()
out = record(dry)
master_out(out)
```